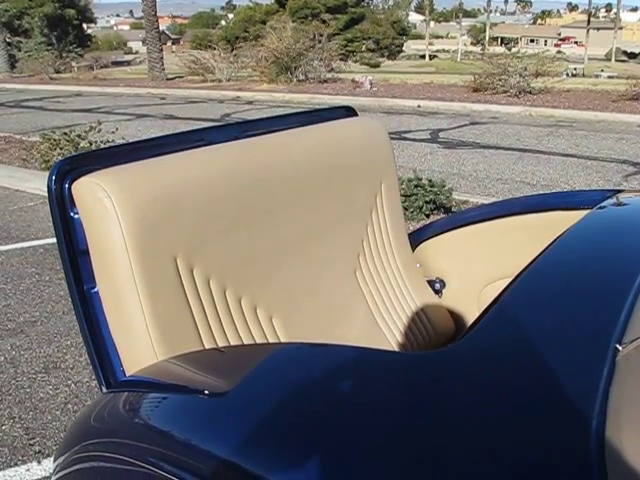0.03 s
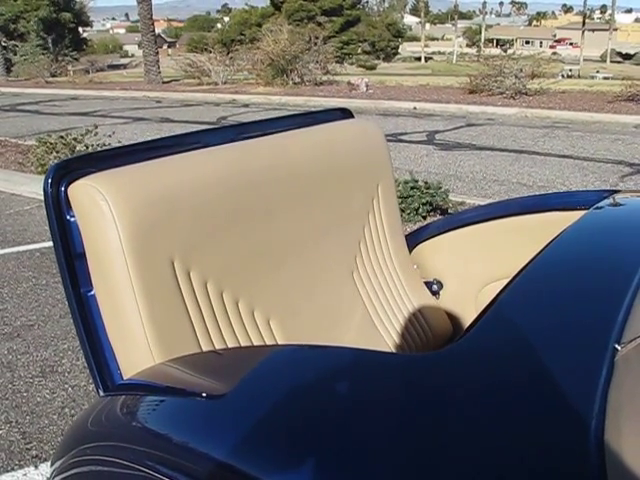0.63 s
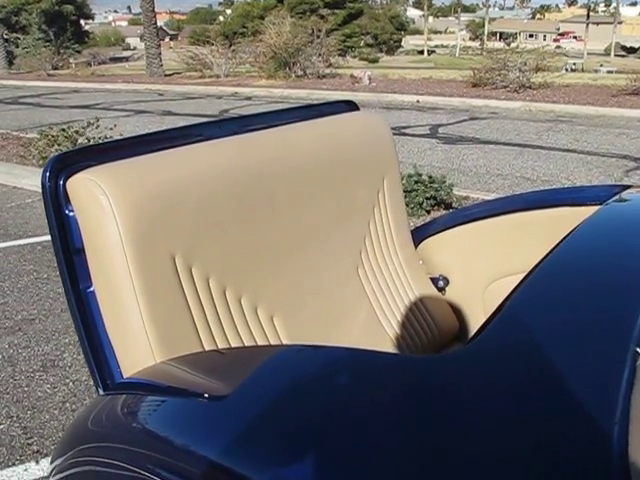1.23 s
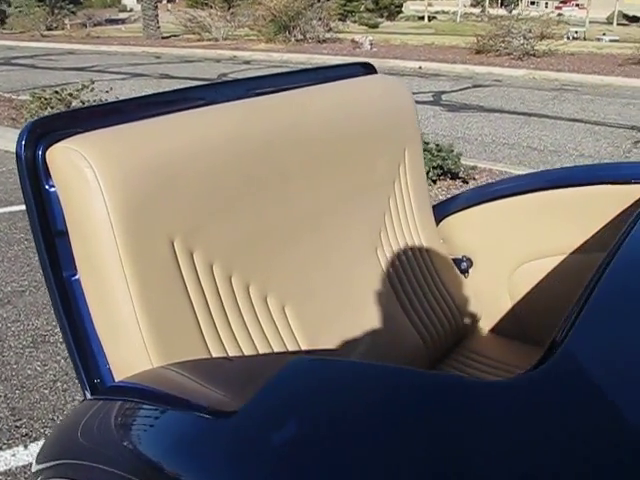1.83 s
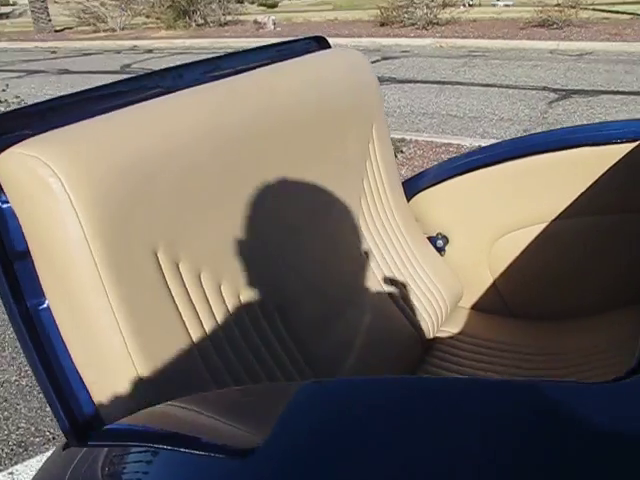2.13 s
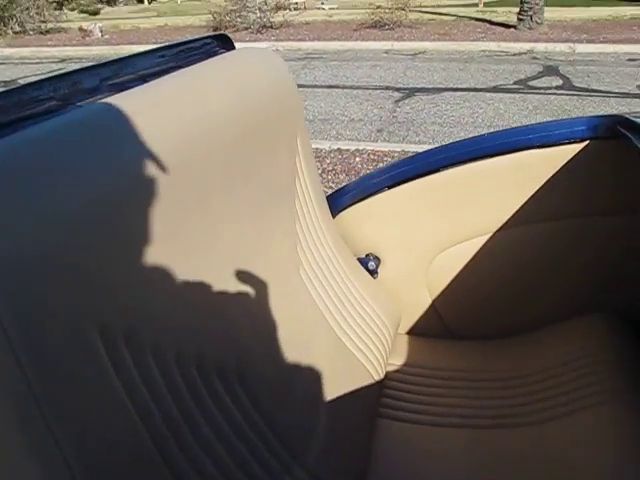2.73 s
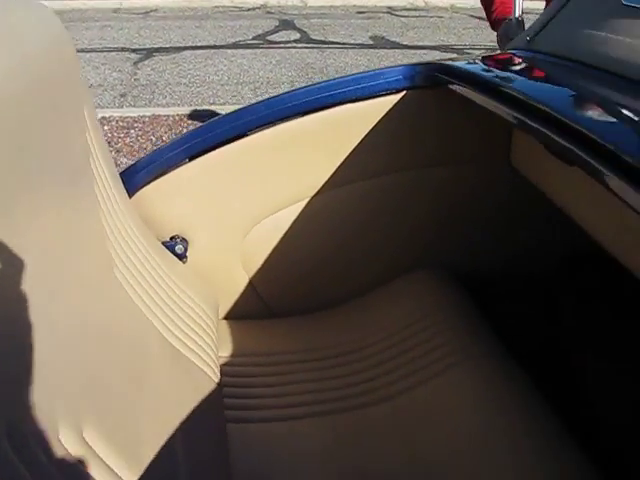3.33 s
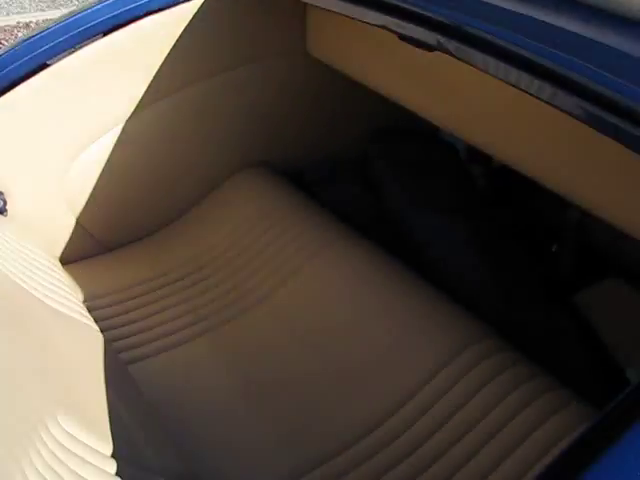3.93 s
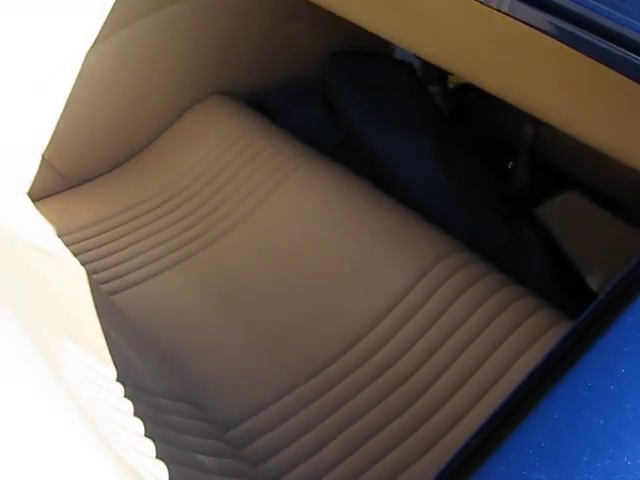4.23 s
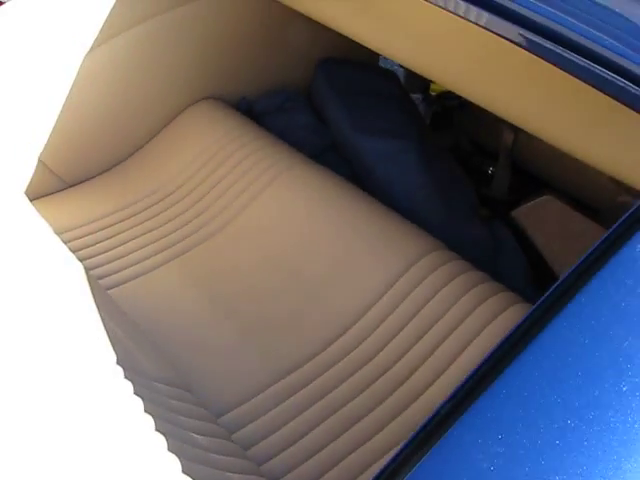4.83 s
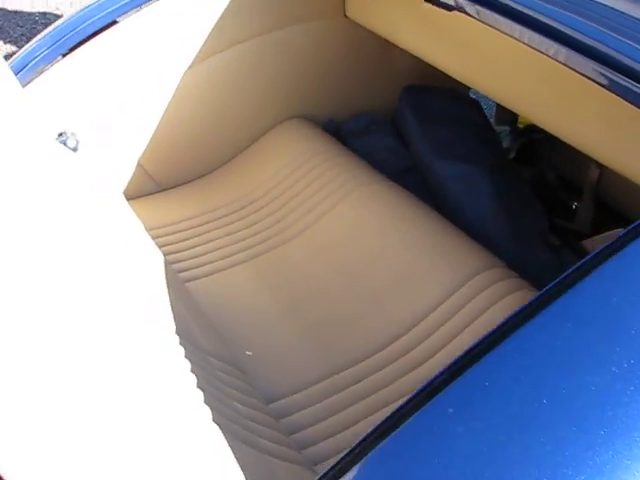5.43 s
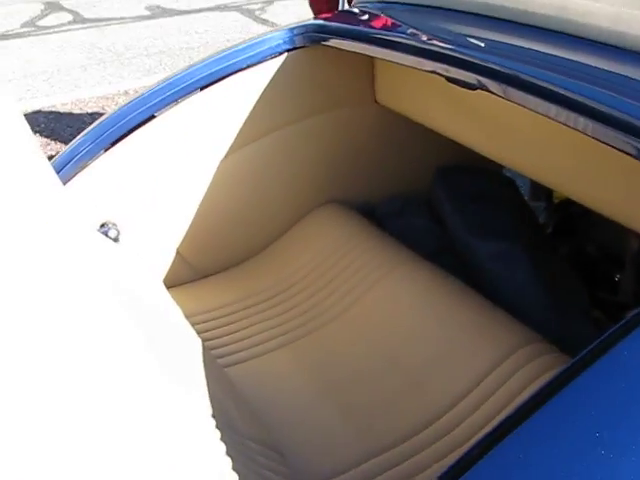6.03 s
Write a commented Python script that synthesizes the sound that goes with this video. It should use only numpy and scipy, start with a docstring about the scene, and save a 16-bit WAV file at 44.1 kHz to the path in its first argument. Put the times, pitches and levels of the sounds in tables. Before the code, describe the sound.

In a parking lot, low wind buffets the microphone unevenly, shifting between left and right, while traffic hums softly far away. A few light, gritty steps on asphalt come early, followed by close handling ticks and a barely audible lens motor whine. As the gusts peak, a camera lever clicks and squeaks briefly, and a finger creaks on the casing among more ticks and scuffs.

```python
"""A parking lot in gusty wind, heard from a hand-held camera.
Eddies buffet each of the two microphone ports on its own, over the wash of distant traffic.
Shoes scuff and crack grit on the asphalt. The camera shell ticks in the hand, a lever clicks
and squeaks, a finger rubs the housing, and the lens motor whines faintly."""
import sys
import numpy as np
from scipy import signal
from scipy.fft import rfft, irfft, next_fast_len
from scipy.io import wavfile
from scipy.ndimage import uniform_filter1d, map_coordinates

SR = 44100
rng = np.random.default_rng(int(sys.argv[2]) if len(sys.argv) > 2 else 0)


def store_pcm(level_fs):
    """Save levels as 16-bit WAV."""
    pcm = np.round(np.clip(level_fs, -1, 1) * 32767).astype(np.int16)
    wavfile.write(sys.argv[1], SR, np.atleast_2d(pcm).T)


N = 267687
SIDES = np.array([[.5], [-.5]])  # left and right share of pan_db


def wind(attack_s=0.012, release_s=0.15, rumble_db=-24.5, rumble_growth=0.35, moderate_db=-30):
    """Gusts add their power to the breeze; both ports feel them, but each catches its own eddies."""
    breeze = [(0.0, -38, 5), (0.28, -34, -6), (0.5, -51.5, 0), (0.66, -46, -8), (0.88, -37, -8),
              (1.2, -42, 11), (1.53, -40.5, 1), (1.85, -43, 5), (2.07, -33, 0), (2.22, -38.5, -5),
              (2.35, -48, -12), (2.5, -41.5, 9), (2.78, -40.5, -9), (3.19, -33.5, -1), (3.3, -45, -4),
              (3.5, -44.5, -33), (3.65, -37.5, -25), (4.1, -35.5, -27.5), (4.54, -26, 3.5),
              (5.03, -24.5, -11), (5.16, -35, -27.5), (5.34, -24, -8), (5.55, -35, -30), (6.07, -34.5, -34)]  # time_s, level_db, pan_db
    gusts = [(-0.004, 0.035, -21.5, 7.5, 0.5), (0.058, 0.073, -24.5, 8.5, 2.5), (0.164, 0.052, -27, 1, 9.5),
             (0.334, 0.061, -29.5, 8, -6), (0.58, 0.041, -25, -0.5, -0.5), (0.681, 0.041, -25.5, 5.5, 5.5),
             (0.76, 0.034, -29.5, 13, 7), (0.831, 0.016, -26.5, 7, 4), (0.934, 0.022, -25.5, 7.5, 8.5),
             (1.034, 0.084, -20.5, 2, -1), (1.247, 0.03, -28.5, -5, 4.5), (1.334, 0.034, -34, -11, 5.5),
             (1.37, 0.066, -21.5, 7.5, 2), (1.658, 0.018, -24.5, 3.5, -8),
             (1.724, 0.0082, -26.5, 11.5, 8.5), (1.834, 0.013, -39, 23.5, 15), (1.879, 0.065, -34.5, 2, 16),
             (1.95, 0.074, -24.5, 4, 10), (2.117, 0.0083, -18.5, -2.5, 2), (2.389, 0.019, -33, 3, 7.5),
             (2.505, 0.054, -36, 11, 8), (2.596, 0.029, -29.5, 12, 10.5), (2.728, 0.042, -33, -8, 9.5),
             (2.81, 0.03, -29, 9, 5), (2.87, 0.044, -29.5, 6.5, 9.5), (2.993, 0.11, -21.5, 2, 6),
             (3.135, 0.018, -17.5, 3, 5.5), (3.342, 0.021, -29.5, -18, -4.5),
             (3.364, 0.074, -23.5, -11, 6.5), (3.463, 0.041, -19.5, -14, 2),
             (3.534, 0.059, -34.5, -26.5, -9), (3.804, 0.058, -38.5, -26, -8),
             (4.002, 0.05, -27.5, -17, 5.5), (4.279, 0.076, -23, 4.5, -0.5), (4.373, 0.1, -24, -15, -1),
             (4.51, 0.082, -17, 4.5, -10), (4.668, 0.099, -20, -4.5, 0), (4.808, 0.033, -21, 6, -10),
             (4.905, 0.054, -23.5, -21.5, 5), (5.063, 0.015, -21.5, 10.5, 5),
             (5.215, 0.017, -17.5, 11.5, -10), (5.424, 0.02, -24.5, 6, -10), (5.659, 0.11, -29, -19, 4.5)]  # start_s, length_s, level_db, pan_db, rumble_over_buffet_db
    rumble_pan_share = 0.48  # large eddies wrap round the camera
    level_db, pan_db = curves(breeze)
    breeze_db = level_db + SIDES * pan_db
    small_power = amp(breeze_db) ** 2
    large_power = amp(rumble_db + rumble_growth * (breeze_db - moderate_db)) ** 2
    for start_s, length_s, level_db, pan_db, bass_db in gusts:
        power = (amp(level_db) * envelope(start_s, length_s, attack_s, release_s)) ** 2
        small_power += power * amp(SIDES * pan_db) ** 2
        large_power += power * amp(bass_db + SIDES * rumble_pan_share * pan_db) ** 2
    large, small = slack() * np.sqrt([large_power, small_power])
    left = port(large[0], small[0], rumble_db=-0.5, buffet_db=-1.8, steepness=1.33)
    right = port(large[1], small[1], rumble_db=0.6, buffet_db=-0.5, steepness=1.31)
    return np.array([left, right])


def port(large, small, rumble_db, buffet_db, steepness, lull_db=-40.5, strong_db=-17):
    """Wind at one port from the strengths of large and small eddies: the harder, the brighter."""
    # eddy spectra, large to small: freq_hz, density_db
    rumble_spectrum = [(10, -28), (22, 2.5), (40, 0.5), (70, -0.5), (95, -3.5), (125, -8), (170, -17),
                       (250, -43.5), (400, -81.5)]
    buffet_spectrum = [(60, -27), (100, -2.5), (135, 3.5), (185, 1.5), (270, -6.5), (380, -15.5),
                       (600, -31), (1500, -70.5)]
    flutter_spectrum = [(170, -11), (300, 12), (420, 6.5), (600, 1), (900, -10.5), (1400, -14), (2000, -21),
                        (3200, -42), (7000, -62), (15000, -71)]
    lull_filter = [(40, 3.5), (65, 0.5), (100, -5.5), (150, -2.5), (250, -17)]  # dulls the rumble in a lull: freq_hz, gain_db
    edge_bite = [(0, -2), (.25, -18), (.9, -18.5), (1.1, -16), (2, -18), (2.8, -23.5), (3.4, -11.5),
                 (4.9, -12), (5.5, -11.5), (5.85, -8), (6.07, -7)]  # wind cutting across the port edges: time_s, flutter_db
    swings = eddies(rumble_spectrum, span_s=0.043, evenness=0.67)
    calm = 1 / (1 + (small / amp(lull_db)) ** 2)
    swings = (1 - calm) * swings + calm * coloured(swings, lull_filter)
    rumble = large * amp(rumble_db + 2.5 * wobble(18)) * swings
    swirl = eddies(buffet_spectrum, span_s=0.0274, evenness=1.0)
    lumps_db = 3 * wobble(60)
    buffet = small * amp(buffet_db + lumps_db) * swirl
    # fine turbulence spurts on the crests of larger eddies
    spurts = unit(noise(flutter_spectrum) * (.25 + np.abs(swirl)) * amp(lumps_db + 2.4 * wobble(120)))
    flutter = amp(strong_db + curves(edge_bite)[0]) * (small / amp(strong_db)) ** steepness * spurts
    return rumble + buffet + flutter


def eddies(spectrum, span_s, evenness):
    """Pressure swings of rms 1, their strength evened out over span_s."""
    swings = noise(spectrum)
    power = np.abs(uniform_filter1d(swings ** 2, int(span_s * SR))) + 1e-4
    evened = swings / power ** (evenness / 2)
    return unit(coloured(evened, [(8, -20.0), (20, -2.0), (1500, 7.0), (4000, -51.5)]))


def slack():
    """Gain of the wind as it drops briefly between gusts."""
    drops = [(0.493, 0.066, -2), (0.665, 0.03, -2), (0.895, 0.04, -3), (0.98, 0.031, -5.5),
             (1.195, 0.06, -0.5), (1.537, 0.05, -9), (1.78, 0.05, 0.5), (2.314, 0.084, -3.5),
             (2.445, 0.05, -5), (2.681, 0.05, -5), (3.308, 0.048, -7.5), (3.666, 0.075, -5.5),
             (5.181, 0.047, -6)]  # centre_s, length_s, gain_db
    t = np.arange(N) / SR
    return amp(sum(db * np.exp(-((t - centre_s) / (length_s / 2)) ** 2)
                   for centre_s, length_s, db in drops))


def puffs(swirl_db=-6, push_db=2, push_s=0.00061, fall_30db_s=0.035, attack_s=0.0015):
    """A sharp eddy hits each port with one push or suck, then breaks up."""
    hits = [(0.07, -21.5, 6), (0.593, -32.5, 2), (0.835, -29, 3), (0.945, -43, 4), (1.074, -13.5, 15.5),
            (1.267, -28, -10), (1.394, -19.5, 1), (1.956, -23, 18), (2.603, -44, 7), (2.817, -18, 4.5),
            (3.05, -17, -9), (3.143, -17.5, -4), (3.387, -18.5, -24), (3.444, -21, -20.5),
            (3.471, -20, -21), (3.815, -19, -29), (4.058, -20, -21), (4.382, -17, 10), (4.44, -16, -10),
            (4.666, -21, -4), (4.912, -14.5, -18), (4.987, -19.5, -33), (5.219, -9.5, 25),
            (5.502, -20, -32)]  # start_s, level_db, pan_db
    swirl_spectrum = [(100, -18.5), (250, 12), (450, 17.5), (700, -3), (1200, -15.5), (2200, -22),
                      (4000, -37), (9000, -68.5)]  # freq_hz, density_db
    out, t = np.zeros((2, N)), np.arange(SR // 10) / SR
    u = t / push_s
    push = u * u * (3 - u) * np.exp(-u)
    for start_s, level_db, pan_db in hits:
        swirl = coloured(rng.standard_normal((2, len(t))), swirl_spectrum)
        swirl *= amp(-30 * t / fall_30db_s) * (1 - np.exp(-t / attack_s))
        swirl /= np.abs(swirl).max(axis=1, keepdims=True)
        polarity = rng.choice([-1, 1], (2, 1))
        puff = amp(swirl_db) * swirl + amp(push_db) * polarity * push / push.max()
        add(out, start_s, amp(level_db) * puff / np.mean(amp(SIDES * pan_db)), pan_db)
    return out


def grit(crack_t60_s=0.0048, crumble_db=-16, crumble_t60_s=0.056, stone_db=8, stone_width=0.27):
    """Stones knock, crack and crumble under a shoe, each at its own pitch. The row at 3.144 s is instead a
    sharp crackle as a hard wind puff strikes."""
    stones = [(1.3244, 1100, -53, 6500, -39, -2), (1.339, 1200, -50, 11000, -42, 0),
              (1.358, 1500, -34, 8500, -29, 2), (1.4022, 1300, -50, 13000, -43, 0),
              (1.406, 1300, -50, 13000, -43, 1), (1.811, 1750, -35, 9500, -33, -4),
              (2.099, 1970, -27, 3250, -30, -3), (2.1263, 990, -23, 2700, -22, 0.5),
              (2.256, 1030, -50, 4900, -39, 6), (3.144, 870, -34, 4000, -25, 7)]  # start_s, knock_hz, knock_db, crack_hz, crack_db, pan_db
    stone_spectrum = [(600, -24), (1500, 8), (3200, 8), (5000, -4), (9000, -6), (13000, -6), (16000, -25)]  # freq_hz, density_db
    out, t = np.zeros((2, N)), np.arange(SR // 12) / SR
    decay = amp(-60 * t / crack_t60_s) + amp(crumble_db - 60 * t / crumble_t60_s)
    for start_s, knock_hz, knock_db, crack_hz, crack_db, pan_db in stones:
        burst = rng.standard_normal((2, len(t))) * decay
        burst = filtered(burst, lambda hz: 1 + amp(stone_db) / (1 + 1j * (hz / crack_hz - 1) / stone_width))
        crack = spread(*coloured(burst, stone_spectrum))
        modes = [(knock_hz, .14 * knock_hz, 0), (1.7 * knock_hz, .2 * knock_hz, -8)]
        knock = resonate(amp(-60 * t / .0004), modes)
        add(out, start_s, at_peak(crack, crack_db) + at_peak(knock, knock_db), pan_db)
    return out


def scuffs(grain_db=3.0, grain_hz=507.0):
    """Soles drag over loose grit."""
    drags = [(1.298, 0.029, -53, 0.5, 3), (1.321, 0.05, -47, 2, 2), (1.414, 0.014, -50, 0, -0.5),
             (1.808, 0.025, -52, -2, 1), (1.921, 0.1, -53, -3, 1), (2.124, 0.018, -56, 0, 2),
             (2.612, 0.11, -50, 0, 0), (2.73, 0.019, -42, -1, -0.5), (5.314, 0.022, -52, 0, 3.5),
             (5.41, 0.05, -46, -0.5, -1.5), (5.708, 0.055, -39, -11, -4), (5.75, 0.045, -40, -10, -1.5),
             (5.784, 0.06, -50.5, -3, 2.5)]  # start_s, length_s, level_db, pan_db, tilt_db_per_oct
    sole_spectrum = [(300, 13), (1000, 8.5), (1500, 7.5), (3000, 3.5), (5000, -4.5), (9000, -15.5),
                     (13000, -14), (16000, -23)]  # freq_hz, density_db
    out = np.zeros((2, N))
    for start_s, length_s, level_db, pan_db, tilt in drags:
        n = int(length_s * SR)
        grains = rng.standard_normal((2, n)) * amp(grain_db * wobble(grain_hz)[:n])
        scuff = unit(tilted(spread(*coloured(grains, sole_spectrum)), tilt))
        add(out, start_s, amp(level_db) * scuff * signal.windows.tukey(n, .5), pan_db)
    return out


def grip(crack_t60_s=0.0085):
    """The shell gives under the hand in ticks, dull or sharp, all with the same hollow ring."""
    ticks = [(2.623, -33, -40, 1, 4), (2.636, -33, -35, 6, 4), (2.641, -29, -33, 1, 7),
             (2.647, -34, -49, 3, 0), (2.6644, -17, -33, 3, 4), (2.702, -37, -31, 4, 1),
             (2.7044, -27.5, -42, 4, 0), (2.709, -27, -27.5, -1, -1), (2.731, -40, -36, -1, 3),
             (2.7373, -35, -32, 1, -3), (3.097, -25, -30, 0, -1), (5.3645, -24, -30, 0, 0),
             (5.392, -42, -35, -4, -5), (5.6352, -19, -26, 0, 1), (5.687, -40, -42, 0, 8),
             (5.693, -40, -40, 0, 8), (5.7004, -34, -36, -6, 6), (5.7076, -25, -34, -7, -1),
             (5.719, -34, -32, -10, 5), (5.7226, -27, -30, -9, -3), (5.7295, -35, -35, -8, 1),
             (5.7553, -29, -25.5, -4, 2), (5.8145, -43, -36, -3, 0), (5.8216, -41, -33, -6, -3)]  # start_s, ring_db, crack_db, pan_db, tilt_db_per_oct
    shell_modes = [(913, 5.5, 0.012), (1090, 0.5, 0.039), (1380, -10, 0.014)]  # freq_hz, level_db, t60_s
    crack_spectrum = [(600, -6), (1500, 4), (3200, 11), (5000, -3.5), (9000, -6.5), (16000, -14)]  # freq_hz, density_db
    out, t = np.zeros((2, N)), np.arange(SR // 20) / SR
    ring = sum(amp(db - 60 * t / t60_s) * np.sin(2 * np.pi * hz * t) for hz, db, t60_s in shell_modes)
    for start_s, ring_db, crack_db, pan_db, tilt in ticks:
        burst = rng.standard_normal((2, len(t))) * amp(-60 * t / crack_t60_s)
        crack = tilted(spread(*coloured(burst, crack_spectrum)), tilt)
        add(out, start_s, at_peak(ring, ring_db) + at_peak(crack, crack_db), pan_db)
    return out


def clicks(snap_db=-9, snap_t60_s=0.01, lever_hz=3600, attack_s=0.000096, lag_s=0.00019):
    """A lever snaps against the housing and its spring pings; the right port hears the housing later."""
    snaps = [(0.058, -57, -3, 30, 9800, -10), (4.571, -24, 1, 1, 9000, -3), (4.741, -36, -3, -2.5, 8750, 0),
             (5.2604, -22, 2.5, 0.5, 8570, 8)]  # start_s, level_db, pan_db, tilt_db_per_oct, spring_hz, lever_db
    housing_modes = [(1130, 2.5, 0.017, 7), (1387, 3.5, 0.025, -3), (1970, -13, 0.0066, 3),
                     (2480, 3, 0.015, -6), (2840, -4, 0.012, -3), (4100, -9, 0.007, -6.5),
                     (4630, -7.5, 0.014, 0), (5600, -14, 0.012, 0), (6970, -6, 0.008, -5),
                     (9400, -3, 0.0035, -9), (10500, -7, 0.005, 0), (11560, -15, 0.006, 0),
                     (13100, -10, 0.005, 2)]  # freq_hz, level_db, t60_s, pan_db
    out, t = np.zeros((2, N)), np.arange(SR // 20) / SR

    def ring(hz, db, t60_s, pan_db):
        return amp(db + SIDES * pan_db - 60 * t / t60_s) * np.sin(2 * np.pi * (hz * t + rng.random()))

    for start_s, level_db, pan_db, tilt, spring_hz, lever_db in snaps:
        housing = sum(ring(*mode) for mode in housing_modes)
        left, right = housing + ring(lever_hz, lever_db, t60_s=0.013, pan_db=0)
        body = np.array([left, np.interp(t - lag_s, t, right)])
        spring = ring(spring_hz, 0, t60_s=0.0098, pan_db=3)
        snap = coloured(rng.standard_normal((2, len(t))), [(1200, 20.0), (9500, 6), (13000, -4)])
        snap *= amp(snap_db - 60 * t / snap_t60_s)
        click = tilted((body + spring + snap) * (1 - np.exp(-t / attack_s)), tilt)
        onset_rms = np.sqrt(np.mean(click[:, :SR // 125] ** 2))
        add(out, start_s, amp(level_db) * click / onset_rms, pan_db)
    return out


def squeak(start_s=5.284, length_s=0.0674, level_db=-37, attack_s=0.0047, release_s=0.025):
    """The sliding lever chatters and scrapes; a higher tone beats against it as it first catches."""
    pitch = [(5.28, 1130), (5.295, 1105), (5.305, 987), (5.318, 1090), (5.333, 1170), (5.347, 1097),
             (5.36, 990)]  # time_s, pitch_hz
    scrape_modes = [(1120, 110, 6), (2400, 280, -11), (3620, 190, -13), (8800, 550, -23)]  # freq_hz, width_hz, level_db
    catch_hz, catch_db, catch_s = 1420, -3, 0.011
    jitter, scrape_db, grain_db = 0.044, -5, 3

    def chatter(hz):
        return unit(np.sin(2 * np.pi * np.cumsum(hz * (1 + jitter * wobble(270))) / SR))

    tone = chatter(curves(pitch)[0])
    tone += amp(catch_db) * envelope(start_s, catch_s, attack_s, release_s) * chatter(catch_hz)
    scrape = unit(spread(*resonate(rng.standard_normal((2, N)), scrape_modes)))
    roughness = unit(amp(grain_db * wobble(300)))
    slide = amp(level_db) * envelope(start_s, length_s, attack_s, release_s)
    return slide * (roughness * tone + amp(scrape_db) * scrape)


def rub(start_s=5.611, length_s=0.028, creak_db=-33, swell_db_per_s=310, fizz_db=-39.5):
    """A finger sticks and slips on the housing, pressing harder until it lets go: a dry creak."""
    creak_modes = [(1110, 134, 11.5), (1720, 130, 4.5), (1960, 240, 4), (2700, 520, -3.5),
                   (5500, 1300, -21)]  # freq_hz, width_hz, level_db
    fizz_spectrum = [(1200, -15), (2000, 14.5), (3200, 6.5), (4000, -15), (5600, 0), (7400, -4),
                     (8500, -13), (11000, -6), (12700, 2), (15500, -6), (16500, -20)]  # freq_hz, density_db
    slip_hz, scatter, attack_s = 900, 0.4, 0.0022
    slip_s = np.cumsum(np.exp(scatter * rng.standard_normal(N // 20)) / slip_hz)
    slips = np.bincount((slip_s[slip_s < N / SR] * SR).astype(int), minlength=N)[:N]
    drag = slips - slips.mean() + 0.026 * rng.standard_normal(N)
    press_db = creak_db + swell_db_per_s * np.clip(np.arange(N) / SR - start_s, 0, length_s)
    creak_gain = amp(press_db) * envelope(start_s, length_s, attack_s, release_s=.012)
    fizz_gain = amp(fizz_db) * envelope(start_s, length_s, attack_s, release_s=.035)
    return creak_gain * unit(resonate(drag, creak_modes)) + fizz_gain * unit(coloured(drag, fizz_spectrum))


def lens(attack_s=.16, release_s=.6):
    """The focus motor's airy whine swells and fades with each run."""
    runs = [(1.92, 0.13, -68.5, 9550, 750), (3.72, 0.22, -70, 9100, 150), (4.103, 0.099, -65.5, 9130, 90),
            (4.3, 0.3, -82, 9150, 120)]  # start_s, length_s, level_db, pitch_hz, width_hz
    out = np.zeros((2, N))
    for start_s, length_s, level_db, pitch_hz, width_hz in runs:
        white = rng.standard_normal((2, N))
        whine = unit(filtered(white, lambda hz: 1 / (1 + ((hz - pitch_hz) / width_hz) ** 2)))
        out += amp(level_db) * envelope(start_s, length_s, attack_s, release_s) * whine
    return out


def traffic():
    """Far traffic: a soft wash, swells of tyre noise and a thin hiss of open air."""
    tyre_levels = [(0, -77), (.7, -66.5), (1.35, -64.5), (1.85, -62), (2.4, -63), (3.5, -64), (4.2, -72),
                   (6.07, -73)]  # time_s, level_db
    air_levels = [(0, -55, -70.5), (.5, -55, -70.5), (1.1, -51, -67), (2.3, -49.5, -64.5),
                  (3, -47.5, -60.5), (4.1, -50.5, -64.5), (4.45, -48, -62), (5, -51.5, -67.5),
                  (6.07, -50.5, -67.5)]  # time_s, wash_db, hiss_db
    # freq_hz, density_db
    tyre_spectrum = [(900, -16), (1900, -3), (3000, 4.5), (4300, -2.5), (5500, -10.5), (9000, -29)]
    wash_spectrum = [(60, 9.5), (200, -10.5), (450, -4.5), (800, 0.5), (1300, -4.5), (2200, -7),
                     (3200, -13.5), (4500, -18), (6500, -30), (12000, -53)]
    hiss_spectrum = [(2500, -4.5), (4500, 3), (6500, -1.5), (9000, -3), (12000, -9), (16000, -12)]
    layers = zip(curves(tyre_levels) + curves(air_levels), [tyre_spectrum, wash_spectrum, hiss_spectrum])
    return sum(amp(db) * spread(noise(spectrum), noise(spectrum)) for db, spectrum in layers)


def amp(db):
    """Decibels to gain."""
    return 10 ** (np.asarray(db) / 20)


def unit(x):
    """x scaled to rms 1."""
    return x / np.sqrt(np.mean(x ** 2) + 1e-20)


def at_peak(x, db):
    """x scaled to a peak of db."""
    return amp(db) * x / np.abs(x).max()


def along(points, hz):
    """(freq_hz, value) points interpolated on a log axis."""
    freq_hz, values = np.transpose(points)
    return np.interp(np.log(hz + 1), np.log(freq_hz + 1), values)


def curves(rows):
    """One value per sample for each column after time_s."""
    time_s, *columns = np.transpose(rows)
    return [np.interp(np.arange(N) / SR, time_s, column) for column in columns]


def wobble(rate_hz):
    """Smooth random curve, rate_hz knots a second."""
    knots = rng.standard_normal(int(N * rate_hz / SR) + 4)
    return map_coordinates(knots, [np.arange(N) * rate_hz / SR])


def envelope(start_s, length_s, attack_s, release_s):
    """Rise centred on start_s, hold, then a fall of 60 dB per release_s."""
    t = np.arange(N) / SR - start_s
    return np.clip(t / attack_s + .5, 0, 1) * amp(-60 * np.clip((t - length_s) / release_s, 0, 2))


def filtered(x, response):
    """x through a complex frequency response."""
    n = x.shape[-1]
    padded = next_fast_len(n + SR // 5)
    return irfft(rfft(x, padded) * response(np.fft.rfftfreq(padded, 1 / SR)), padded)[..., :n]


def coloured(x, spectrum):
    """x through a (freq_hz, gain_db) spectrum."""
    return filtered(x, lambda hz: amp(along(spectrum, hz)))


def tilted(x, db_per_oct):
    """x made brighter or duller by a slope from 1 to 12 kHz."""
    return filtered(x, lambda hz: amp(db_per_oct * np.log2(np.clip(hz, 1000, 12000) / 1000)))


def resonate(x, modes):
    """x through (freq_hz, width_hz, level_db) resonances of alternating sign."""
    return filtered(x, lambda hz: sum(
        (-1) ** k * amp(db) * np.sqrt(mode_hz * hz) * width / (mode_hz ** 2 - hz ** 2 + 1j * hz * width)
        for k, (mode_hz, width, db) in enumerate(modes)))


def noise(spectrum):
    """Coloured noise of rms 1."""
    return unit(coloured(rng.standard_normal(N), spectrum))


def spread(a, b):
    """Two unrelated signals as a stereo pair, most alike in the low mids."""
    likeness = [(100, 0.37), (700, 0.97), (1500, 0.67), (3100, 0.19), (6800, 0.056), (15000, .1)]  # left to right: freq_hz, correlation
    angle = lambda hz: np.arccos(along(likeness, hz)) / 2
    mid = filtered(a, lambda hz: np.cos(angle(hz)))
    side = filtered(b, lambda hz: np.sin(angle(hz)))
    return np.array([mid + side, mid - side])


def add(out, start_s, sound, pan_db):
    """Mix a short sound into the stereo track; positive pan_db is left."""
    part = out[:, max(round(start_s * SR), 0):][:, :sound.shape[-1]]
    part += (sound * amp(SIDES * pan_db))[:, :part.shape[1]]


def scene():
    """All sources at the two ports, with no walls near enough to echo."""
    return wind() + puffs() + traffic() + grit() + scuffs() + grip() + clicks() + squeak() + rub() + lens()


def record(dry):
    """The camera clips at full scale and cuts the top treble."""
    cutoff_hz = 15700
    return filtered(np.clip(dry, -1, 1), lambda hz: 1 / np.sqrt(1 + (hz / cutoff_hz) ** 120))


dry = scene()
out = record(dry)
store_pcm(out)
```